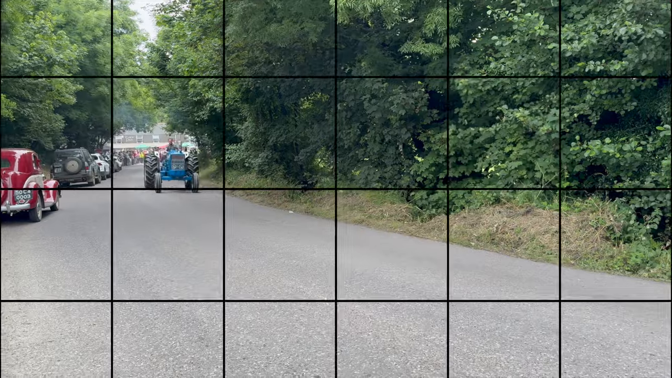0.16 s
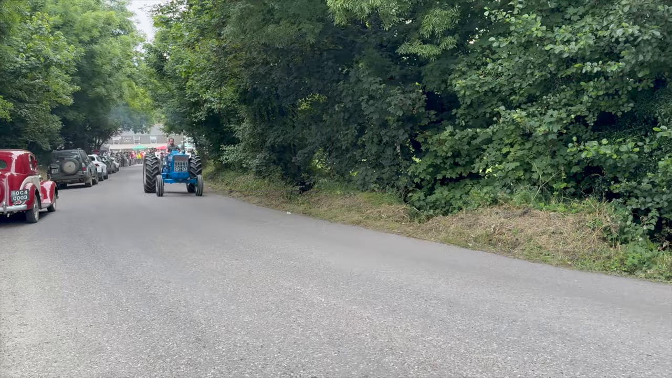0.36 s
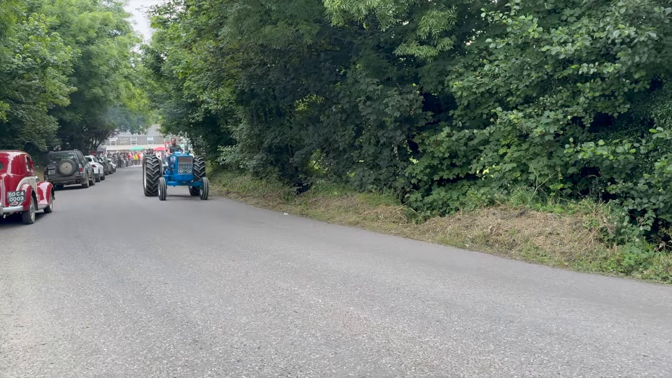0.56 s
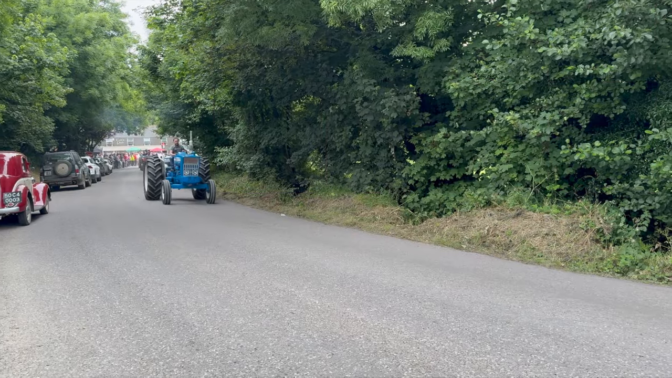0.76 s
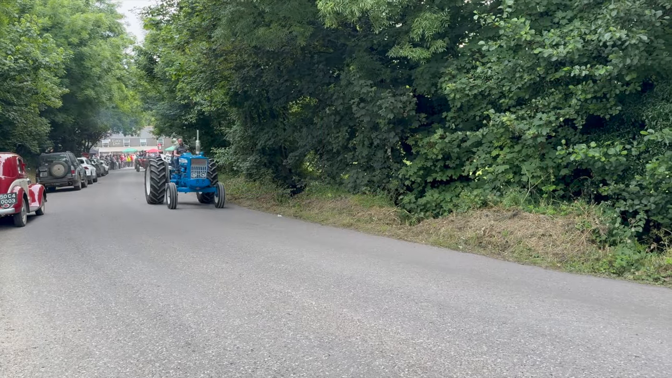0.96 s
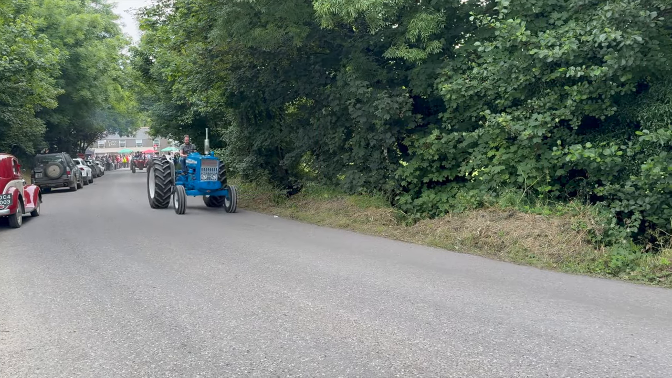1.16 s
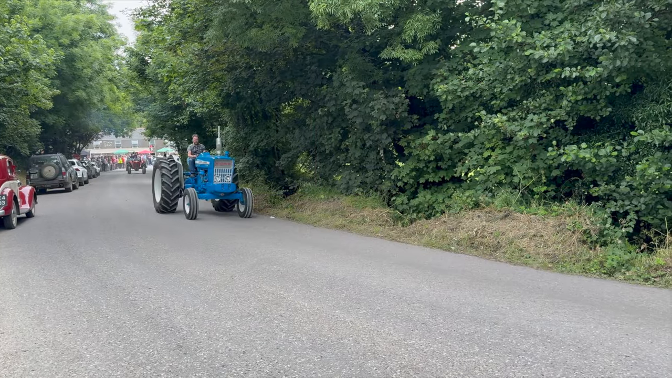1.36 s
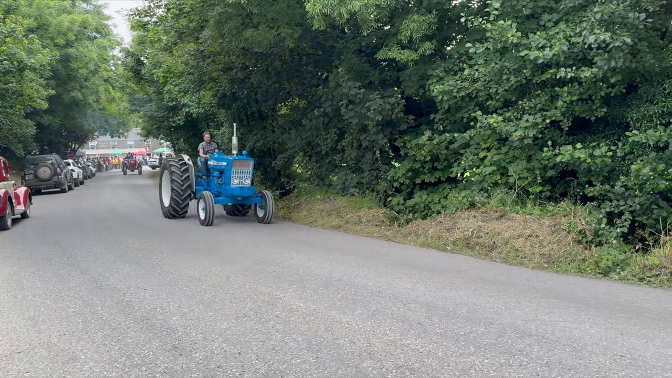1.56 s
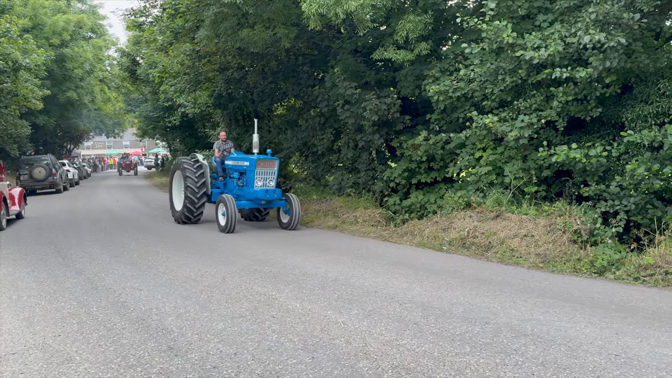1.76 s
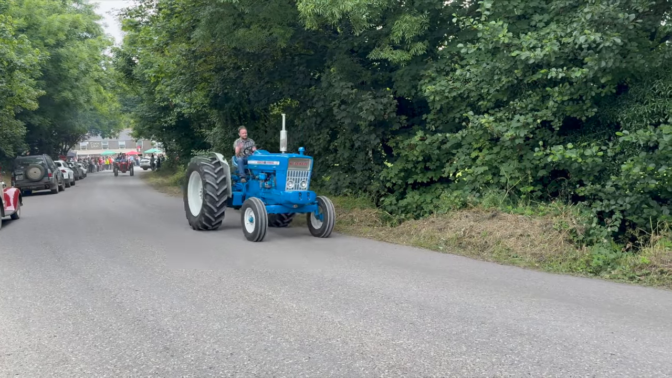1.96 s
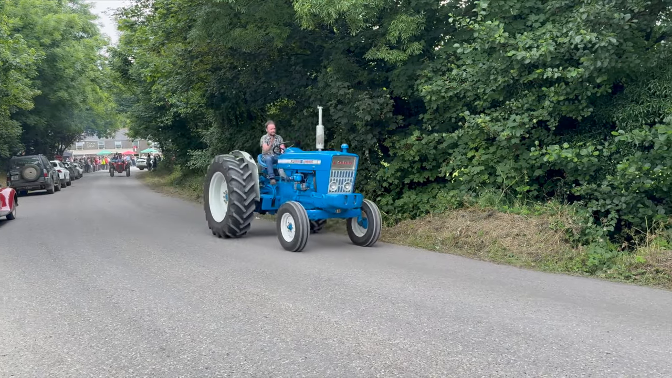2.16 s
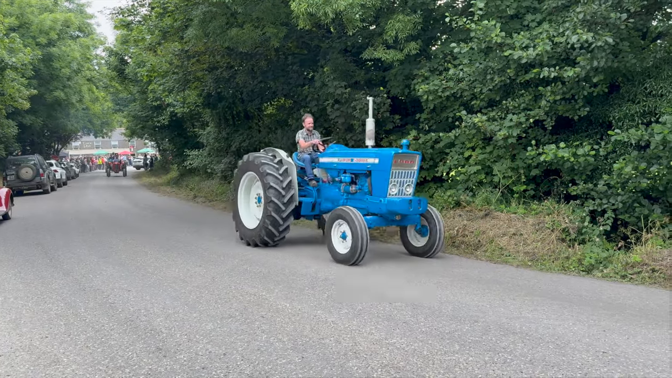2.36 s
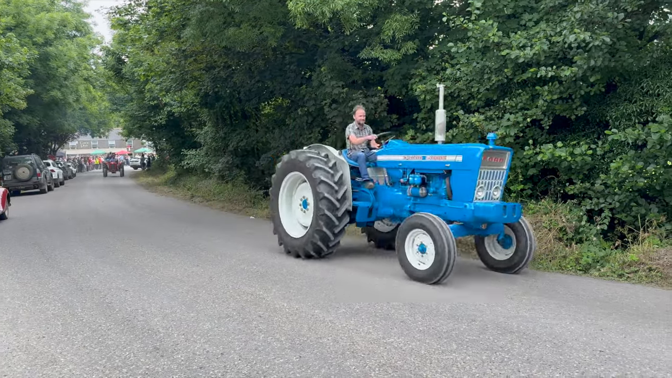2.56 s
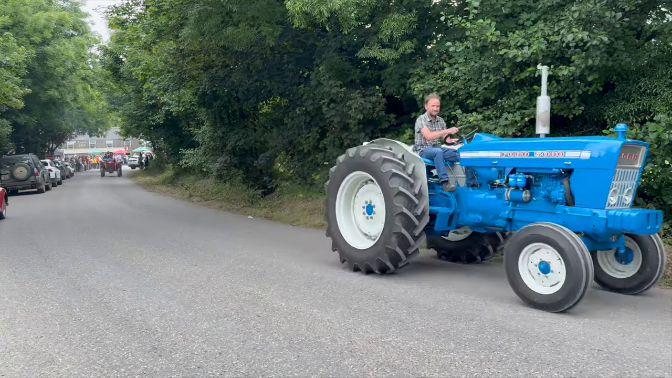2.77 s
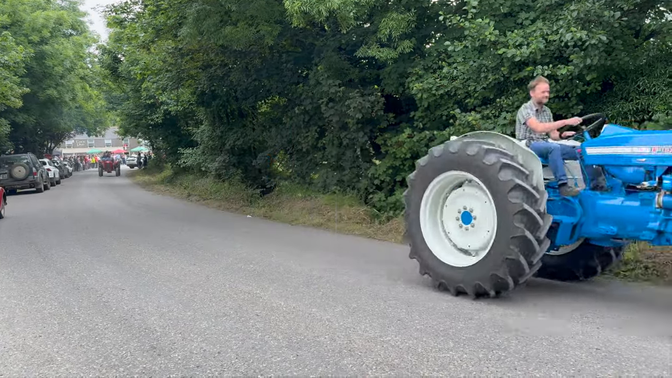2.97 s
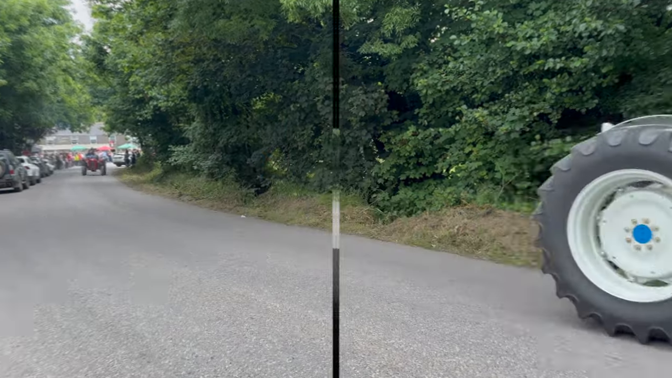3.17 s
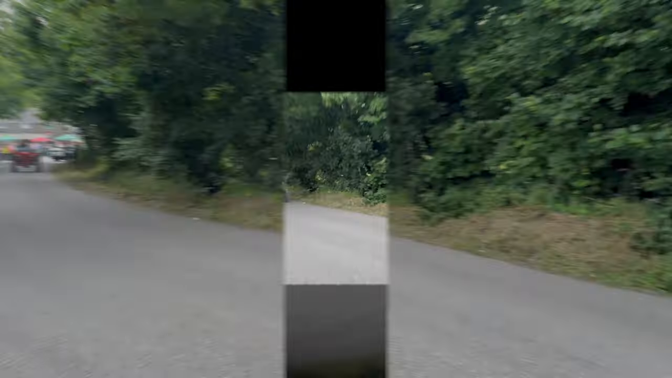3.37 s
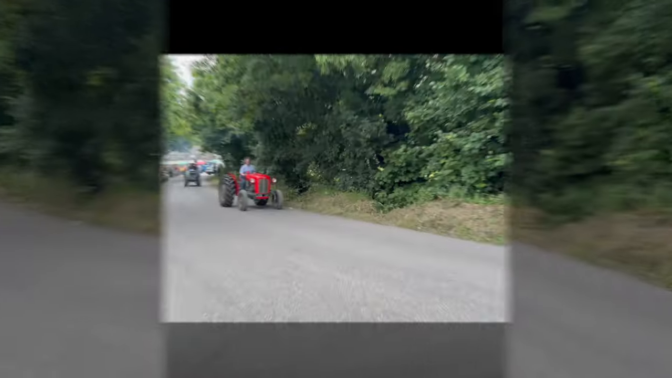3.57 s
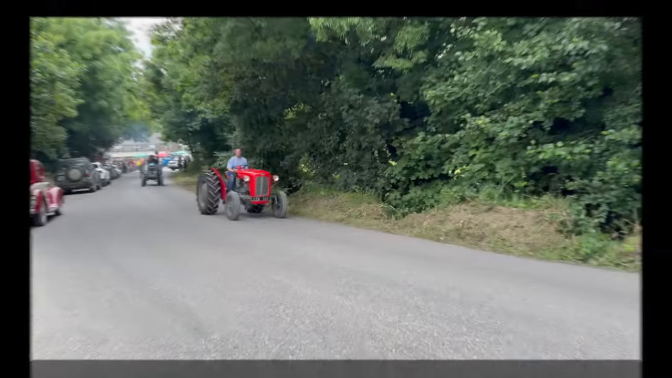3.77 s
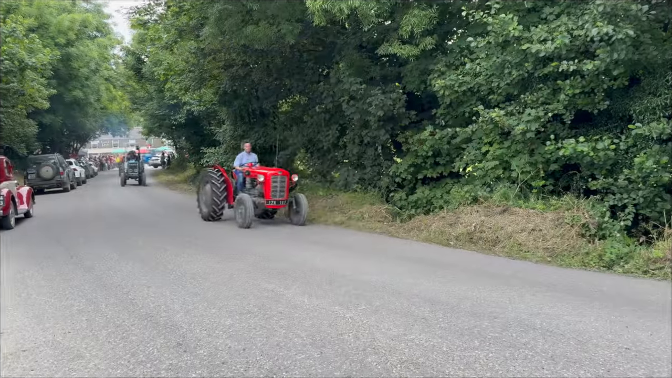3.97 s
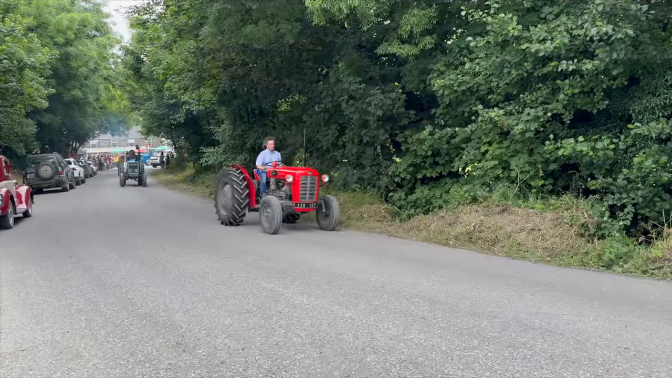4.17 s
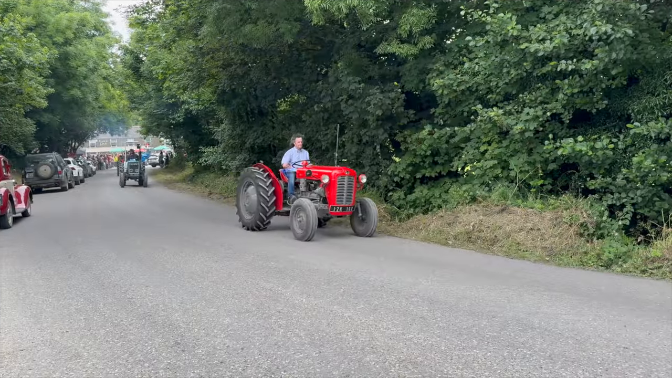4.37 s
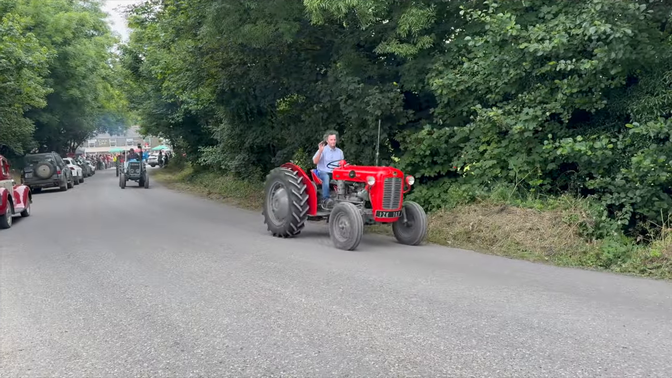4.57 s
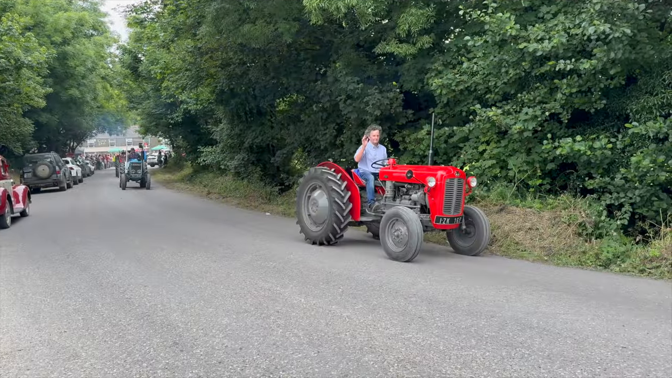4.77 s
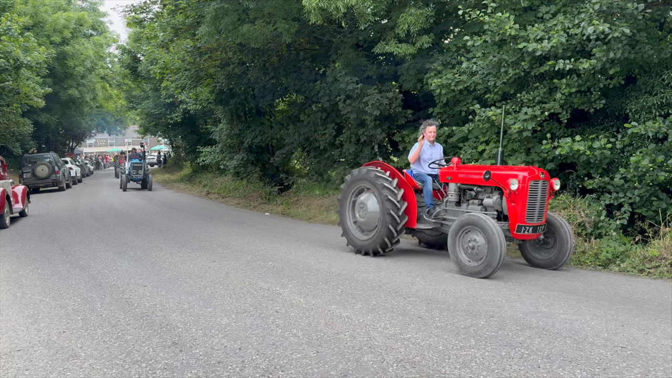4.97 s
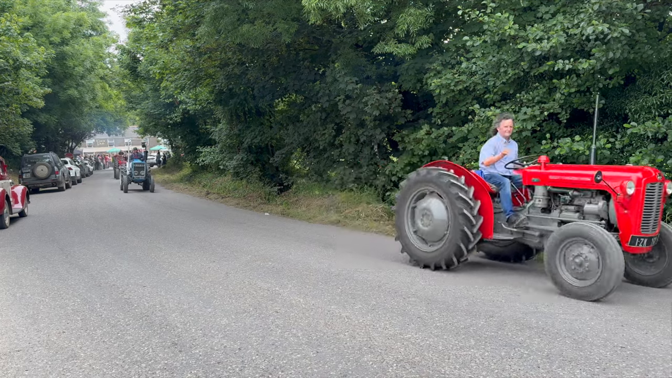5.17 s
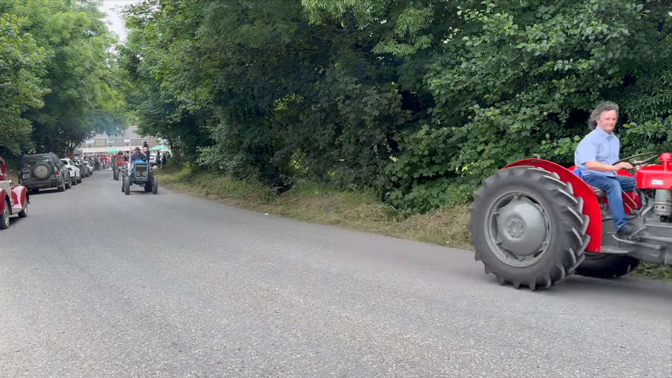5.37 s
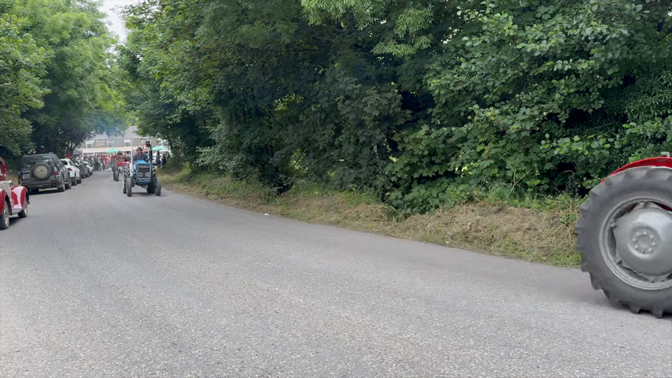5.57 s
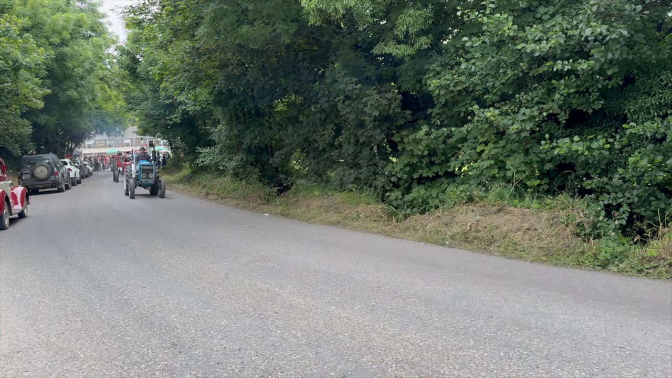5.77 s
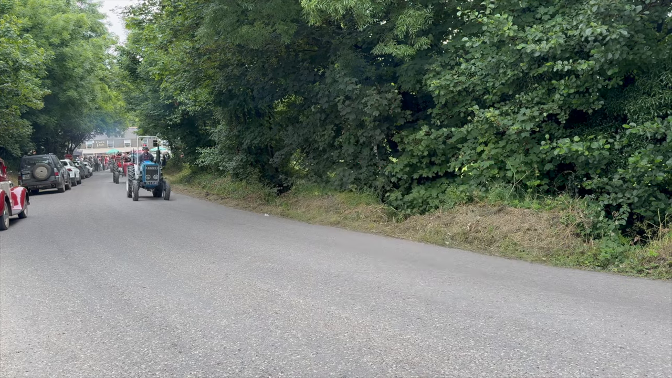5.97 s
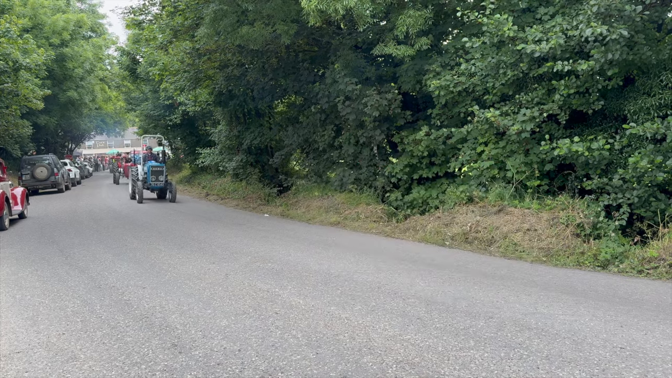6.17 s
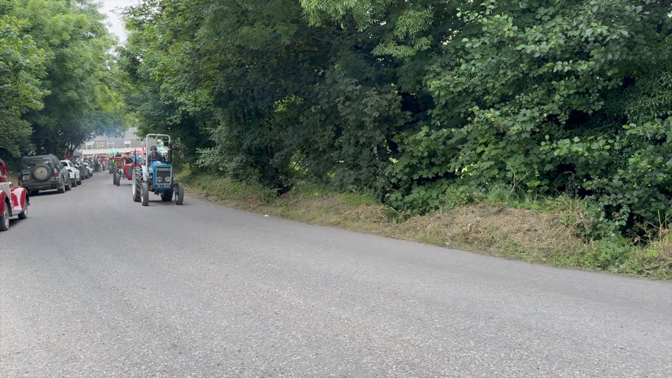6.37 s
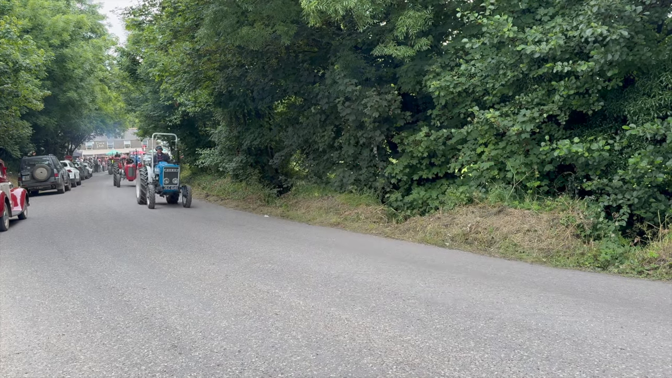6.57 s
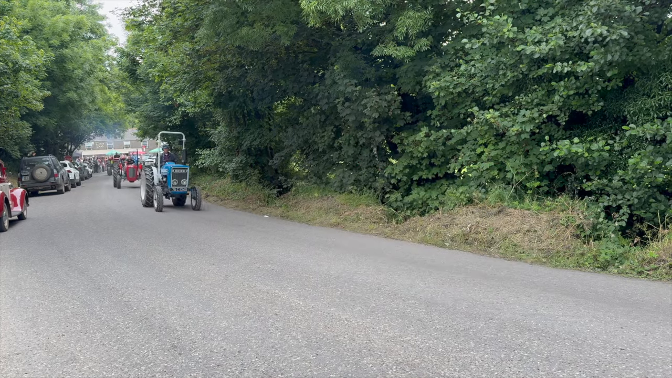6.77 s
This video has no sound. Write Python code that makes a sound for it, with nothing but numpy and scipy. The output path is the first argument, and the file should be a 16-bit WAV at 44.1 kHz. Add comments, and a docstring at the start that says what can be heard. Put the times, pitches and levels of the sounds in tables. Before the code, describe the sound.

Old diesel tractors pass close by one after another on a country road, the first droning and clattering, the second booming with a barking exhaust.

```python
"""Old tractors on a country road

Old diesel tractors drive past one after another, from left to right, on a road lined by a hedge.
The first has four cylinders and drones and clatters; the second has three and a barking exhaust.
A third follows with firings almost as fast as the second's, so their booms beat; more hum far off.
Engine tones are sine waves locked to the firings. Rattles are noise bursts, one per firing, coloured
by ringing metal. Exhaust barks are short pipe rings, and the tyres swish as filtered noise.
"""
import sys
import numpy as np
from scipy import signal
from scipy.fft import rfft, irfft, next_fast_len
from scipy.io import wavfile
from scipy.ndimage import map_coordinates

SR = 44100
rng = np.random.default_rng(int(sys.argv[2]) if len(sys.argv) > 2 else 0)


def wav_out(sig):
    """Save sig, one row per channel (or a flat mono array), as 16-bit PCM at SR to the path in sys.argv[1]."""
    wavfile.write(sys.argv[1], SR, np.round(np.clip(np.atleast_2d(sig).T, -1, 1) * 32767).astype(np.int16))


N = 300762  # length in samples

# How fast each engine is heard to fire: start_s, firings_per_s
FIRST_RATE = [(0, 62), (.8, 62.8), (1.4, 63.3), (2.2, 63.4), (2.9, 62.9), (3.5, 62.1), (4.2, 61.5)]
SECOND_RATE = [(0, 46.5), (3.8, 46.6), (4.45, 46.1), (5.05, 45.8), (5.65, 45.6), (5.95, 45.15),
               (6.25, 44.7), (6.82, 44.3)]
THIRD_RATE = [(0, 46.5), (6.1, 46.5), (6.4, 46), (6.6, 45.2), (6.82, 44.9)]

# Engine, fan and gear tones: multiple_of_firing_rate, level_db
FIRST_OVERTONES = [(3, -2.5), (4, -2), (6, -13)]
FIRST_FAN = [(1.333, -4.5), (2.667, -.5), (5.333, -12)]
FIRST_GEARS = [(17, -8), (17.54, 0)]
FIRST_DRONE = [(9.5, -4), (10, -1), (11, -3), (12, -1), (13, -3), (14, -6), (18.6, -6), (20, -4)]
SECOND_BOOM = [(2, 0), (3, -17), (4, -19)]
SECOND_OVERTONES = [(3, -1.5), (5, 1), (7, -5), (8, -2), (10, -8), (12, -6)]
SECOND_DRONE = [(8, 0), (15, -2), (16, -2), (18, -4), (20, -4), (21, -4), (24, -9)]
THIRD_BOOM = [(1, -17), (2, 0), (3, -20), (4, -19)]
SECOND_FAN_MULTIPLE = 3.865  # fan hum, as a multiple of the firing rate

# Tone colour of the broad noises: pitch_hz, level_db
FIRST_FRONT = [(35, -28), (70, -29), (170, 0), (250, -4.5), (340, -2), (440, -9.5), (550, -1), (700, -0.5),
               (780, -12), (880, -11.5), (1080, 0), (1310, -3), (1480, -34), (2200, -32)]
FIRST_SIDE = [(50, -8), (160, 1.5), (280, -6), (338, -4), (461, -2), (615, -1), (748, 1.5), (1010, -3),
              (1070, -4.5), (1130, 1), (1160, -3.5), (1500, -11.5), (1950, -50), (3300, -120)]
FIRST_CLATTER = [(820, -58), (1400, 1), (2270, -5.5), (3270, -7.5), (5180, -10.5), (7950, -30), (8390, -18),
                 (8720, -71), (9000, -30), (11700, -62), (19800, -120)]
SECOND_RUMBLE = [(55, -15), (150, 4), (230, -3), (320, -1), (450, -5), (600, -1.5), (850, -3), (1150, -5.5),
                 (1400, -14), (2000, -34.5)]
SECOND_CLATTER = [(820, -8), (1400, 1), (1810, -5.5), (1990, -5.5), (2630, -4.5), (3200, -10), (4040, -14),
                  (5140, -16.5), (6750, -15), (9000, -13.5), (11700, -69), (19800, -120)]
HISS = [(4000, -28), (7000, 4), (8200, -8.5), (10000, 7.5), (12000, 5.5), (14000, 0), (16000, 4.5)]
DISTANT = [(30, -1), (70, 3), (180, -4.5), (400, -7.5), (680, -7), (1000, -14), (1600, -17), (2700, -21.5),
           (6000, -30.5), (12000, -44)]

# Ringing parts of the tractors: pitch_hz, width_hz, level_db
FIRST_BLOCK = [(1682, 95, 4.5), (2218, 138, 1), (2710, 160, -3.5), (3470, 550, -6), (5940, 5900, -18.5)]
FIRST_BONNET = [(1153, 71, -7), (1277, 62, -5), (1338, 72, -15)]
FIRST_MUFFLER = [(644, 36, 7), (560, 47, -7), (698, 30, -7)]
FIRST_GRILLE = [(1086, 60, -4.5), (1310, 110, -3.5)]
FIRST_INJECTORS = [(3480, 200, -10), (3780, 270, -2.5), (4380, 81, -4)]
FIRST_COVERS = [(1800, 380, -0.5), (2400, 170, -3), (2850, 150, -7)]
SECOND_BONNET = [(1150, 88, 4), (1735, 160, -2.5), (2480, 270, -12)]
SECOND_COVERS = [(1880, 380, 2.5), (2430, 460, -3.5), (3070, 190, -3)]
SECOND_INJECTORS = [(5300, 890, -2), (6900, 1000, -5)]
SECOND_GRILLE = [(3570, 420, 0)]

# Parts of each tractor, each louder in one direction: level_db, aim_deg, lobe_width_deg, loss_outside_db
FIRST_PARTS = { "boom": (-15.5, -58.5, 46, 6), "octave": (-19, -35, 28.5, 7.5),
               "overtones": (-27, -12.5, 48, 13), "fan": (-26, 22, 28, 3.5), "muffler": (-22, -48, 30, 11),
               "body": (-17, -7, 52.5, 12), "grille": (-24.5, -46.5, 9.5, 8.5),
               "bonnet": (-23, -28, 20.5, 14.5), "injectors": (-33.5, -25, 19, 16),
               "block": (-23, -40, 18, 4.5), "covers": (-24, -5, 24.5, 23), "clatter": (-24.5, -12, 65, 7),
               "hiss": (-23.5, 3, 57, 17), "drone": (-27.2, -3, 17, 20), "whine": (-24, -1, 11, 18),
               "tyres": (-30.5, 6, 17, 16), }
SECOND_PARTS = { "throb": (-24.5, 15, 30, 6), "boom": (-22, 6, 33, 1), "overtones": (-32, -32, 26, 14),
                "fan": (-20.8, 11, 39, 19), "fan octave": (-26.5, -4, 45, 16), "drone": (-29.5, 24, 18, 20),
                "grille": (-36.5, -36.5, 25, 24), "rumble": (-21, -8.5, 63, 8.5),
                "pipe": (-18.5, -1, 33, 17), "rasp": (-24, 18, 21, 24), "bonnet": (-29.5, -28, 23, 8),
                "rattle": (-32, -5, 12, 18), "clatter": (-31, 2, 43, 2), "hiss": (-38.5, -1, 40, 18),
                "injectors": (-40, 1.5, 13, 24), "tyres": (-38, 21.5, 5.5, 8.5), }

# The passes: when each tractor draws level (s), its road speed (m/s), and the distance of the lane (m)
FIRST_LEVEL_S, FIRST_SPEED_M_S = 3.014, 3.48
SECOND_LEVEL_S, SECOND_SPEED_M_S = 5.425, 3.7
LANE_M = 5.3

# The first pass fades over into the second: time_s, share_of_second
HANDOVER = [(3.25, 0.095), (3.75, 1)]
# The whole scene starts a little softer: time_s, level_db
FADE_IN = [(0, -2), (.22, 0)]

# The open side of the first engine comes into view around this bearing, over this angle
FLANK_DEG, FLANK_TURN_DEG = -19, 19
# The rear wheel screens the second tailpipe: around this bearing, over this angle, by this much
WHEEL_DEG, WHEEL_TURN_DEG, WHEEL_DB = 10.8, 2.6, -8

# Second tailpipe: ring and rasp when level with us, and the powers of distance by which they sag or climb
PIPE_HZ, PIPE_SAG = 757, .08
RASP_HZ, RASP_CLIMB = 862, 1.3
PUTT_FALL_HZ_PER_S = 11000  # each putt falls in pitch as the gas slows
# Strength of the putts, one row per cylinder: level_db
CYLINDER_DB = [.8, .6, -1.6]

# Hard diesel knocks of the second tractor, mostly one engine cycle apart: start_s, level_db
KNOCKS = [(5.162, -29), (5.270, -26), (5.337, -21.5), (5.404, -24), (5.467, -26), (5.533, -28)]
KNOCK_DECAY_S = .0022
# A tiny squeak on the second tractor: its middle, pitch, level and half-length
SQUEAK_S, SQUEAK_HZ, SQUEAK_DB, SQUEAK_LENGTH_S = 5.71, 3450, -32, .005

# Loudness of the third tractor, up to a peak and down again: time_s, level_db
THIRD_LEVEL = [(3.75, -32), (4.2, -24), (6.3, -20.5), (6.55, -25), (6.82, -30)]
# Far convoy: noise level, and the pitch of the one engine that hums out of it
DISTANT_DB, FAR_HUM_HZ = -27, 73.26
# Loudness of that far hum: time_s, level_db
FAR_HUM_LEVEL = [(0, -33), (2, -35), (3.5, -46)]

# How alike left and right are, limited to -1 (opposite) to 1 (the same): pitch_hz, likeness
ALIKE = [(60, 0.97), (250, 0.97), (700, 0.92), (1400, 0.52), (2800, 0.46), (4000, 0.3), (6500, 0.09),
         (7700, -0.53), (8500, -1.19), (9600, -1.007), (11000, -0.78), (13000, 0.65), (15500, 0.058)]
# Lag of the far channel: longest, bearing of no lag, angle over which it builds, pitch above which it fades
LAG_MS, CENTRE_DEG, LAG_TURN_DEG, LAG_TOP_HZ = 0.28, -9.5, 21.2, 2050
# Left minus right at every bearing: pitch_hz, difference_db
CHANNELS = [(150, .2), (700, 1.6), (1400, 1.5), (2800, -.7), (5200, 3.5), (8000, .3), (13000, 0)]
# More left minus right, in full for a tractor just past, furthest to the right: pitch_hz, difference_db
SHADOW = [(150, -.6), (380, -2), (750, -7.5), (1400, -4), (2800, -1.8), (5200, 1.3), (11000, 0)]
SHADOW_DEG, SHADOW_SPREAD_DEG = 19, 31  # bearing and spread of that shadow

# Band that is kept, and the amplitude at which peaks round off
LOW_CUT_HZ, TOP_HZ, CEILING = 36, 15800, .92


def amp(db):
    """Turn decibels into a gain."""
    return 10 ** (np.asarray(db) / 20)


def unit(x):
    """Scale to an rms (average strength) of 1."""
    return x / np.sqrt(np.mean(x ** 2) + 1e-20)


def along(points, hz):
    """Read a table of pitch and value at any pitch, on a log axis."""
    f, v = np.transpose(points)
    return np.interp(np.log(hz + 1), np.log(f + 1), v)


def curves(rows):
    """Give one value per sample for each column after the time."""
    s, *cols = np.transpose(rows)
    return [np.interp(np.arange(N) / SR, s, c) for c in cols]


def wobble(rate):
    """A smooth random curve with this many random points a second."""
    points = rng.standard_normal(int(N * rate / SR) + 4)
    return map_coordinates(points, [np.arange(N) * rate / SR])


def filtered(x, response):
    """Filter x by a response that depends on frequency."""
    m = next_fast_len(N + SR // 4)
    hz = np.fft.rfftfreq(m, 1 / SR)
    return irfft(rfft(x, m) * response(hz), m)[..., :N]


def colour(points):
    """Make a filter response from a tone colour table."""
    return lambda hz: amp(along(points, hz))


def resonances(modes, low_hz):
    """Ringing metal: a sum of resonances that radiates little sound below low_hz."""
    def response(f):
        ring = 0
        for k, (centre, width, db) in enumerate(modes):
            sign = (-1) ** k  # neighbours ring in opposite directions
            ring = ring + sign * amp(db) * 1j * f * width / (centre ** 2 - f * f + 1j * f * width)
        return ring * f ** 4 / (f ** 4 + low_hz ** 4)
    return response


def radiate(pair, response):
    """Filter two noises and mix them so that left and right are as alike as ALIKE says."""
    m = next_fast_len(N + SR // 4)
    hz = np.fft.rfftfreq(m, 1 / SR)
    turn = np.arccos(np.clip(along(ALIKE, hz), -1, 1)) / 2
    shares = np.array([np.cos(turn), np.sin(turn)])
    mid, side = rfft(pair, m) * response(hz) * shares
    return unit(irfft([mid + side, mid - side], m)[:, :N])


def firings(rows):
    """Add up the firing rate into a running count of firings."""
    return np.cumsum(curves(rows)[0]) / SR


def tones(fired, orders, waver_db):
    """Sine tones locked to the engine's turning, each wavering a little in level."""
    total = 0
    for multiple, db in orders:
        total = total + amp(db + waver_db * wobble(9)) * np.sin(2 * np.pi * multiple * fired)
    return np.sqrt(2) * total


def knocks(fired, decay, base, locked, count):
    """Steady noise (base) plus a burst per firing; the locked share repeats every engine cycle.

    The decay is in firings, and count is the number of cylinders.
    """
    stroke = fired.astype(int)
    each_firing = rng.standard_normal(stroke[-1] + 1)[stroke]
    each_cylinder = unit(rng.standard_normal(count))[stroke % count]
    size_db = 1.5 * (each_firing + each_cylinder)
    burst = base + amp(size_db) * np.exp(-(fired % 1) / decay)
    # one engine cycle of noise, looped at the engine's own speed
    cycle = int(count * N / fired[-1])
    even = unit(irfft(np.exp(2j * np.pi * rng.random((2, cycle // 2 + 1))), cycle))
    pattern = even[:, (fired / count % 1 * cycle).astype(int)]
    fresh = rng.standard_normal((2, N))
    return burst * (np.sqrt(locked) * pattern + np.sqrt(1 - locked) * fresh)


def rattle(fired, count, decay, base, locked, response):
    """Firing bursts shake a part of the tractor, which colours them."""
    return radiate(knocks(fired, decay, base, locked, count), response)


def drive_by(level_s, speed):
    """Distance (in lane distances) and bearing (degrees) of a tractor on a straight road."""
    ahead = (np.arange(N) / SR - level_s) * speed / LANE_M
    return np.hypot(1, ahead), np.degrees(np.arctan(ahead))


def lobe(bearing, aim, width):
    """1 on the aim, falling to 0 on either side."""
    return np.exp(-((bearing - aim) / width) ** 2)


def heard(parts, distance, bearing):
    """Gain of each part: it falls with distance and outside the part's lobe."""
    gain = {}
    for name, (db, aim, width, loss_db) in parts.items():
        outside = 1 - lobe(bearing, aim, width)
        gain[name] = amp(db - loss_db * outside) / distance
    return gain


def place(pair, bearing):
    """Place a sound by the time lag and level difference between left and right."""
    hz, s, z = signal.stft(pair, SR, nperseg=1024)
    bearing = np.interp(s, np.arange(N) / SR, bearing)
    hz = hz[:, None]
    off = (bearing - CENTRE_DEG) / LAG_TURN_DEG
    lag_s = LAG_MS / 1000 * np.tanh(off * abs(off)) / (1 + (hz / LAG_TOP_HZ) ** 4)
    shadow = lobe(bearing, SHADOW_DEG, SHADOW_SPREAD_DEG)
    pan_db = along(CHANNELS, hz) + along(SHADOW, hz) * shadow
    # half of each difference goes to the left, the opposite half to the right
    left = amp(pan_db / 2) * np.exp(-1j * np.pi * hz * lag_s)
    return signal.istft(z * np.array([left, 1 / left]), nperseg=1024)[1][:, :N]


def convoy():
    """Far tractors blend into a low noise up the road; the hum of one engine stands out of it."""
    noise = radiate(rng.standard_normal((2, N)), colour(DISTANT))
    murk = amp(DISTANT_DB) * place(noise, np.full(N, -70))
    cycles = FAR_HUM_HZ * np.arange(N) / SR + .099 * wobble(4)
    hum = tones(cycles, [(1, .0044)], waver_db=.5)
    return murk + amp(curves(FAR_HUM_LEVEL)[0]) * hum


def third_tractor():
    """Still far up the road, it is only a boom: a few low tones locked to its firings."""
    boom = tones(firings(THIRD_RATE), THIRD_BOOM, waver_db=2.0)
    return amp(curves(THIRD_LEVEL)[0]) * boom


def tyres():
    """The lugged rear tyres swish on the asphalt: noise with an uneven level."""
    noise = rng.standard_normal((2, N))
    return amp(2.6 * wobble(30)) * radiate(noise, resonances([(4780, 1200, 0)], low_hz=3500))


def first_tractor():
    """Four cylinders: the muffler colours the approach, then the open engine side is heard."""
    fired = firings(FIRST_RATE)
    distance, bearing = drive_by(FIRST_LEVEL_S, FIRST_SPEED_M_S)
    side_on = .5 + .5 * np.tanh((bearing - FLANK_DEG) / FLANK_TURN_DEG)
    from_front, from_side = np.sqrt(1 - side_on), np.sqrt(side_on)
    front = rattle(fired, 4, decay=1.0, base=1.0, locked=.66, response=colour(FIRST_FRONT))
    flank = rattle(fired, 4, decay=.4, base=1.8, locked=.55, response=colour(FIRST_SIDE))
    block = rattle(fired, 4, decay=1.0, base=1.0, locked=.26,
                   response=resonances(FIRST_BLOCK, low_hz=1330))
    valves = rattle(fired, 4, decay=1.0, base=1.0, locked=.28, response=colour(FIRST_CLATTER))
    sounds = {
        "boom": tones(fired, [(1, 0)], waver_db=.5),
        "octave": tones(fired, [(2, 0)], waver_db=.5),
        "overtones": tones(fired + .008 * wobble(5), FIRST_OVERTONES, waver_db=1.5),
        "fan": tones(fired, FIRST_FAN, waver_db=1.2),
        "drone": tones(fired + .005 * wobble(12), FIRST_DRONE, waver_db=2),
        "whine": tones(fired + .0035 * wobble(22), FIRST_GEARS, waver_db=1.5),
        "muffler": rattle(fired, 4, decay=.55, base=1.6, locked=.9,
                          response=resonances(FIRST_MUFFLER, low_hz=475)),
        "body": amp(-2.5) * from_front * front + from_side * flank,
        "block": from_front * block,
        "clatter": from_side * valves,
        "bonnet": rattle(fired, 4, decay=.057, base=1.0, locked=.21,
                         response=resonances(FIRST_BONNET, low_hz=880)),
        "grille": rattle(fired, 4, decay=.27, base=.61, locked=.75,
                         response=resonances(FIRST_GRILLE, low_hz=880)),
        "injectors": rattle(fired, 4, decay=.15, base=.12, locked=.4,
                            response=resonances(FIRST_INJECTORS, low_hz=2800)),
        "covers": rattle(fired, 4, decay=.25, base=.45, locked=.5,
                         response=resonances(FIRST_COVERS, low_hz=1400)),
        "hiss": rattle(fired, 4, decay=.3, base=1.6, locked=.35, response=colour(HISS)),
        "tyres": tyres(),
    }
    gain = heard(FIRST_PARTS, distance, bearing)
    return place(sum(gain[part] * sounds[part] for part in sounds), bearing)


def putts(fired, pipe_hz, crest, rise, fall, jitter, scatter_db):
    """Each firing swells into a short, falling ring of the pipe, loudest about crest seconds later."""
    stroke = fired.astype(int)
    size_chance, time_chance = rng.standard_normal((stroke[-1] + 1, 2))[stroke].T
    age = (fired % 1) / np.gradient(fired) / SR - crest  # seconds from the crest
    swell = np.exp(-(age / np.where(age < 0, rise, fall)) ** 2)
    shape = swell * np.sin(np.pi * (fired % 1))
    size_db = np.take(CYLINDER_DB, stroke, mode="wrap") + scatter_db * size_chance
    cycles = pipe_hz * (age + jitter * time_chance) - PUTT_FALL_HZ_PER_S * age ** 2 / 2
    return unit(amp(size_db) * shape * np.sin(2 * np.pi * cycles))


def hedge(x, t60):
    """Leaves and trunks scatter a short echo, different left and right, fading 60 dB in t60 seconds."""
    t = np.arange(SR // 3) / SR
    tail = rng.standard_normal((2, len(t))) * amp(-60 * t / t60)
    return unit(signal.fftconvolve(x[None], tail, axes=1)[:, :N])


def exhaust_bark(fired, distance, bearing):
    """The low tailpipe putts and rasps once a firing, and the hedge answers the putts."""
    pipe = putts(fired, PIPE_HZ / distance ** PIPE_SAG, crest=.0078, rise=.0028, fall=.0048,
                 jitter=.00005, scatter_db=.7)
    behind_wheel = .5 + .5 * np.tanh((bearing - WHEEL_DEG) / WHEEL_TURN_DEG)
    # the echo gains on the direct sound with distance
    echo = amp(-14) * distance ** 2 * hedge(pipe, t60=.2)
    # the rasp is a shorter, higher putt with a gush of rough gas; both climb as the tractor leaves
    rasp_hz = RASP_HZ * distance ** RASP_CLIMB
    rasp = putts(fired, rasp_hz, crest=.0078, rise=.002, fall=.004, jitter=.00006, scatter_db=1)
    carrier = 2 * np.pi * np.cumsum(rasp_hz) / SR
    gush = unit(wobble(260) * np.sin(carrier) + wobble(260) * np.cos(carrier))
    return amp(WHEEL_DB * behind_wheel) * (pipe + echo), unit(rasp + gush)


def diesel_knocks():
    """Near its closest, single hard combustion knocks of the second tractor ring the engine covers."""
    t = np.arange(N) / SR
    blows = sum(amp(db) * (t >= s) * np.exp(-abs(t - s) / KNOCK_DECAY_S) for s, db in KNOCKS)
    return blows * radiate(rng.standard_normal((2, N)), resonances(SECOND_COVERS, low_hz=1400))


def squeak():
    """One tiny metallic chirp, a brief sine, as the second tractor's rear goes by."""
    t = np.arange(N) / SR - SQUEAK_S
    swell = np.exp(-(t / SQUEAK_LENGTH_S) ** 2)
    return amp(SQUEAK_DB) * swell * np.sin(2 * np.pi * SQUEAK_HZ * t)


def second_tractor():
    """Three cylinders: a deep boom, a humming fan and a barking tailpipe over the diesel clatter."""
    fired = firings(SECOND_RATE)
    distance, bearing = drive_by(SECOND_LEVEL_S, SECOND_SPEED_M_S)
    pipe, rasp = exhaust_bark(fired, distance, bearing)
    # a number added to fired makes that part strike earlier, by that share of a firing
    sounds = {
        "throb": tones(fired, [(1, 0)], waver_db=1),
        "boom": tones(fired, SECOND_BOOM, waver_db=.6),
        "overtones": tones(fired + .004 * wobble(8), SECOND_OVERTONES, waver_db=1.5),
        "fan": tones(fired + .0015 * wobble(8), [(SECOND_FAN_MULTIPLE, 0)], waver_db=1.2),
        "fan octave": tones(fired + .004 * wobble(14), [(2 * SECOND_FAN_MULTIPLE, 0)], waver_db=2),
        "drone": tones(fired + .004 * wobble(14), SECOND_DRONE, waver_db=2),
        "pipe": pipe,
        "rasp": rasp,
        "rumble": rattle(fired, 3, decay=.61, base=1.5, locked=.43, response=colour(SECOND_RUMBLE)),
        "bonnet": rattle(fired, 3, decay=1.0, base=.39, locked=.7,
                         response=resonances(SECOND_BONNET, low_hz=900)),
        "grille": rattle(fired, 3, decay=.3, base=1, locked=.22,
                         response=resonances(SECOND_GRILLE, low_hz=2500)),
        "rattle": rattle(fired + .29, 3, decay=.1, base=.79, locked=.32,
                         response=resonances(SECOND_COVERS, low_hz=1400)),
        "injectors": rattle(fired + .45, 3, decay=.2, base=.55, locked=.2,
                            response=resonances(SECOND_INJECTORS, low_hz=4000)),
        "clatter": rattle(fired + .3, 3, decay=.059, base=1.0, locked=.22,
                          response=colour(SECOND_CLATTER)),
        "hiss": rattle(fired + .16, 3, decay=.2, base=1.6, locked=.11, response=colour(HISS)),
        "tyres": tyres(),
    }
    gain = heard(SECOND_PARTS, distance, bearing)
    engine = sum(gain[part] * sounds[part] for part in sounds)
    return place(engine + diesel_knocks() + squeak(), bearing)


def scene():
    """The first pass gives way to the second and third tractors, with the convoy behind throughout."""
    later = curves(HANDOVER)[0]
    background = convoy()
    followers = third_tractor() + second_tractor()
    road = background + (1 - later) * first_tractor() + later * followers
    return amp(curves(FADE_IN)[0]) * road


def record(dry):
    """Round off the highest peaks, then cut the deepest bass and everything from TOP_HZ up."""
    rounded = dry / (1 + np.abs(dry / CEILING) ** 8) ** (1 / 8)
    return filtered(rounded, lambda hz: (hz < TOP_HZ) * hz ** 8 / (hz ** 8 + LOW_CUT_HZ ** 8))


dry = scene()
out = record(dry)
wav_out(out)
```